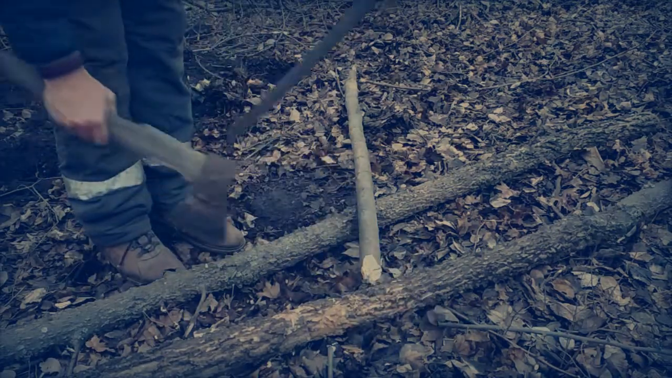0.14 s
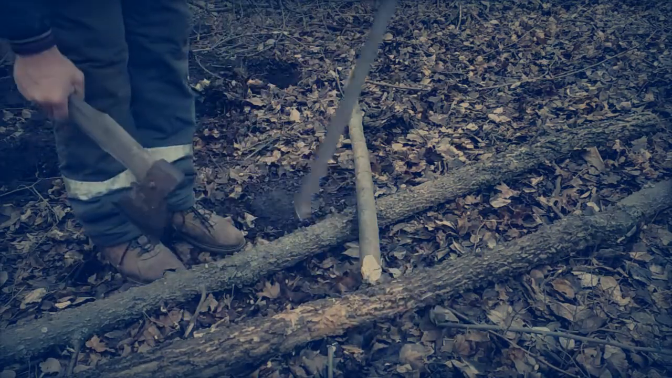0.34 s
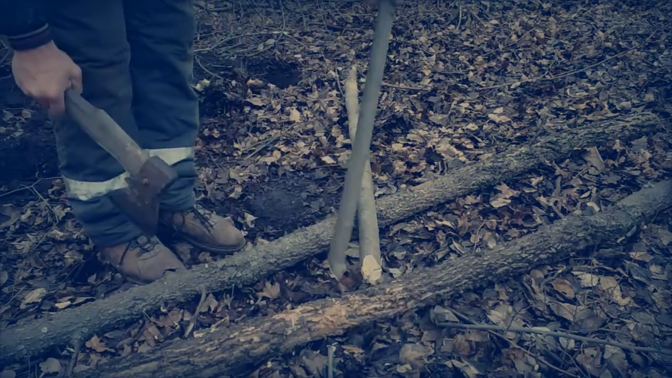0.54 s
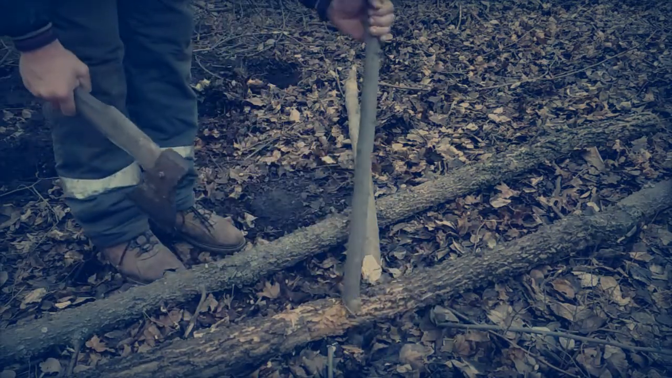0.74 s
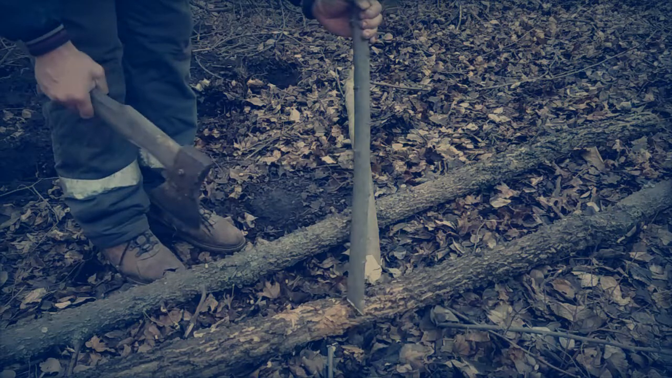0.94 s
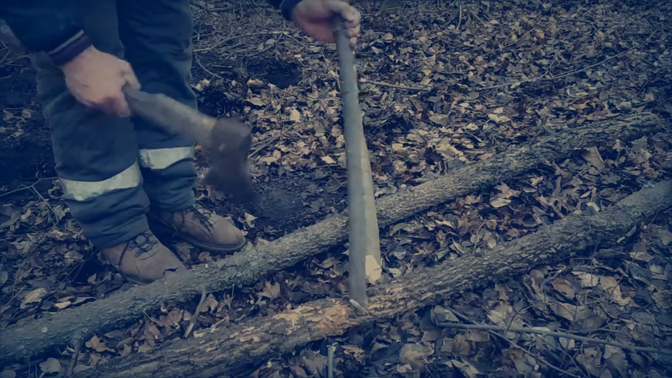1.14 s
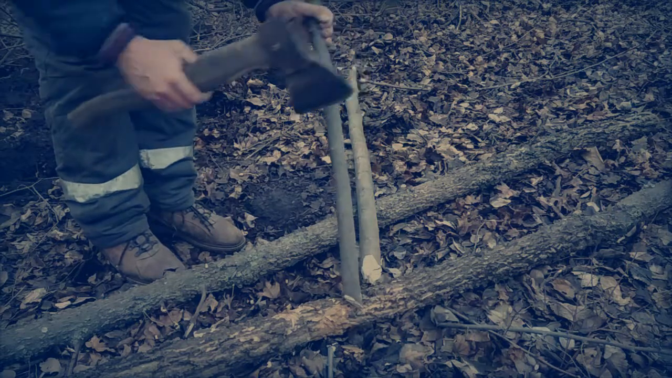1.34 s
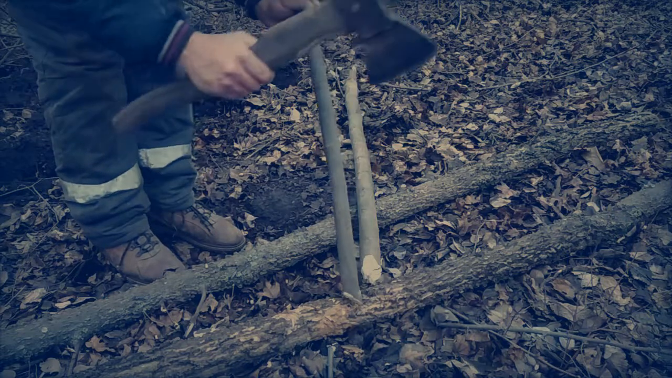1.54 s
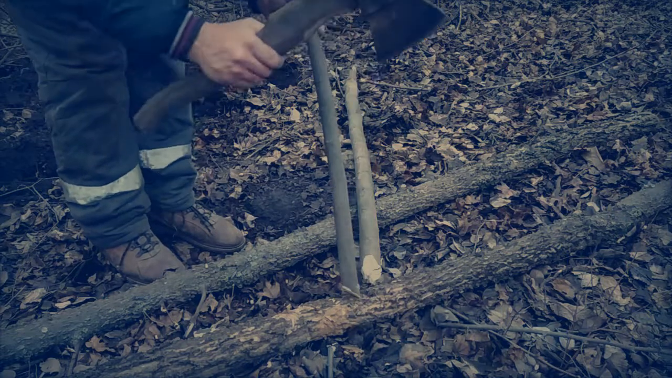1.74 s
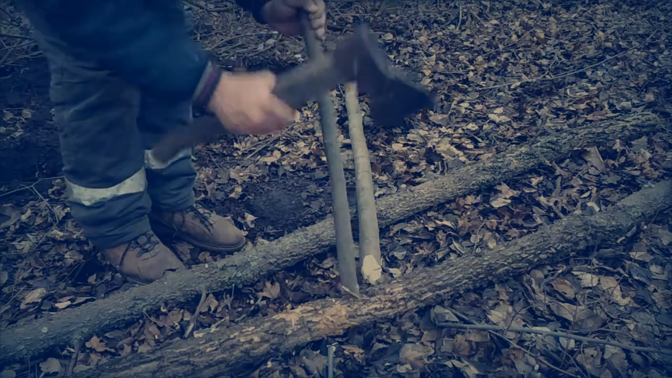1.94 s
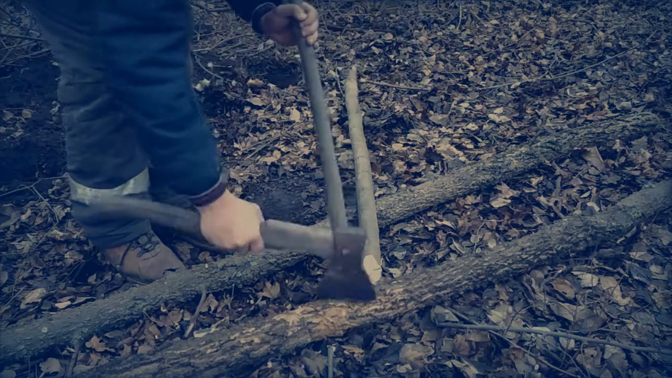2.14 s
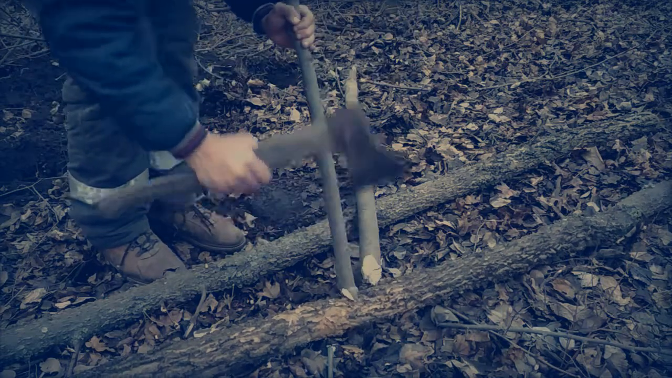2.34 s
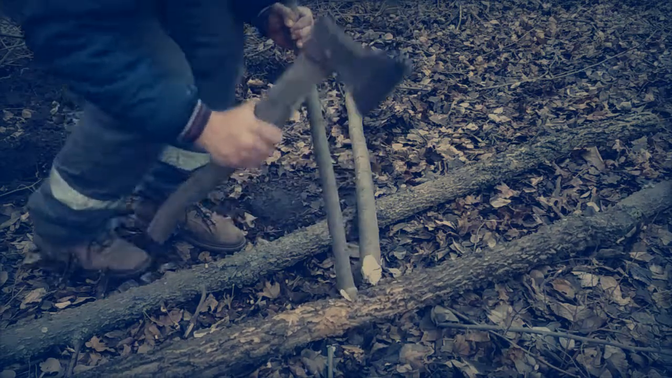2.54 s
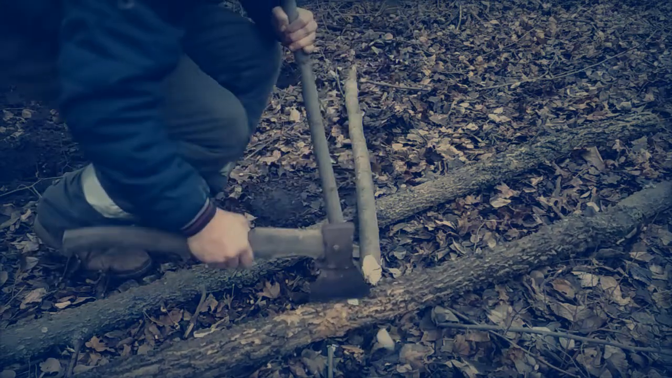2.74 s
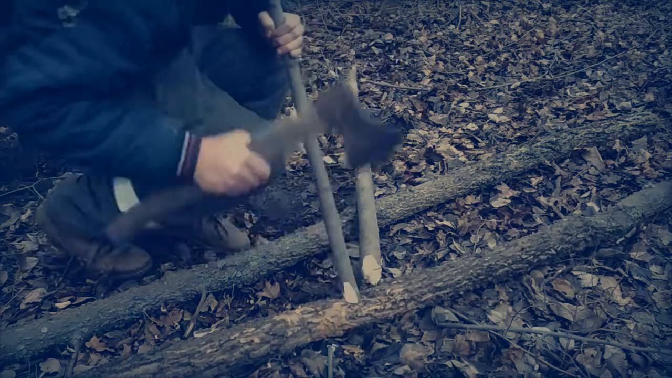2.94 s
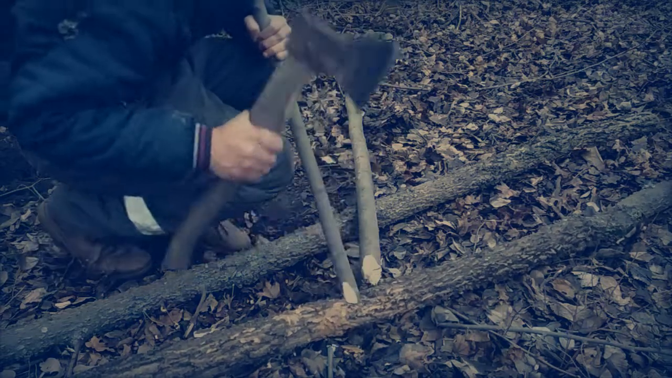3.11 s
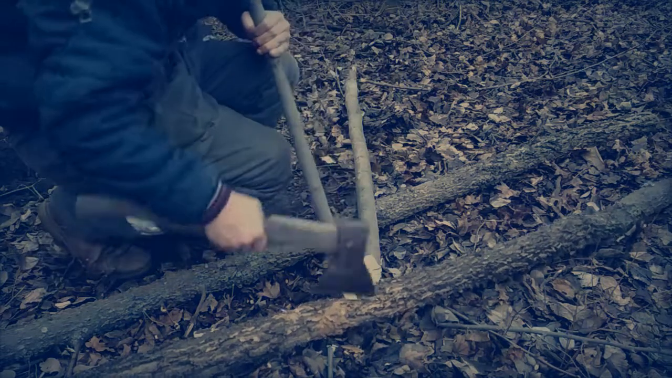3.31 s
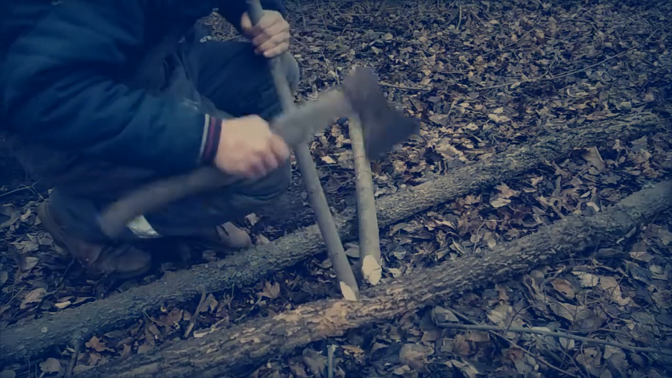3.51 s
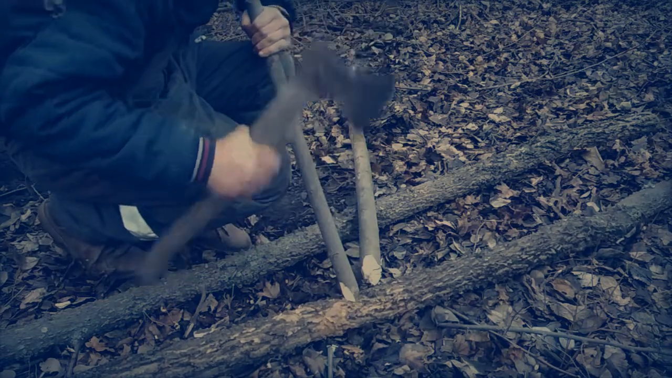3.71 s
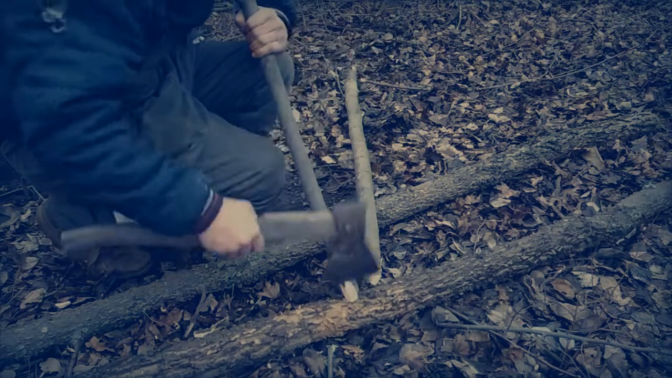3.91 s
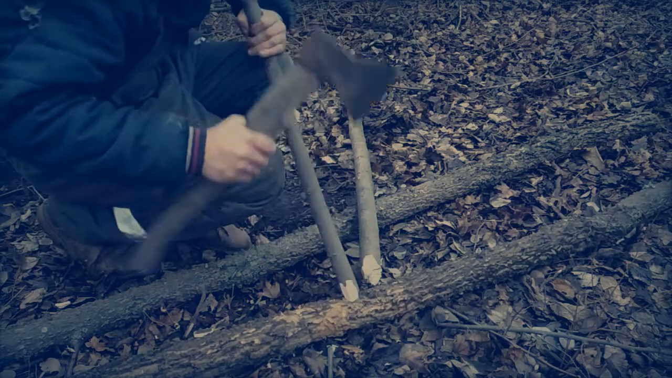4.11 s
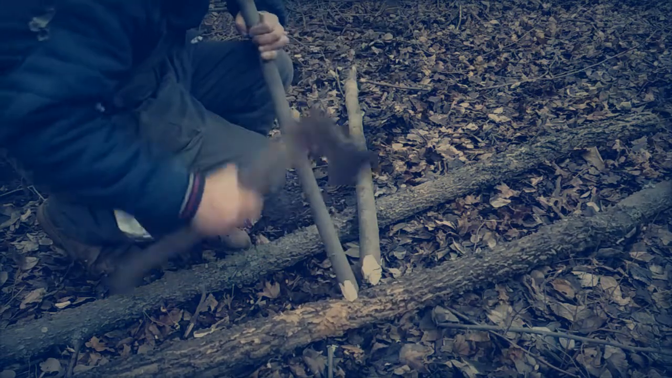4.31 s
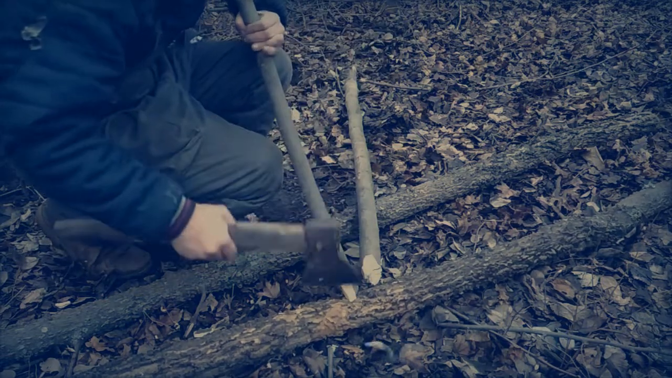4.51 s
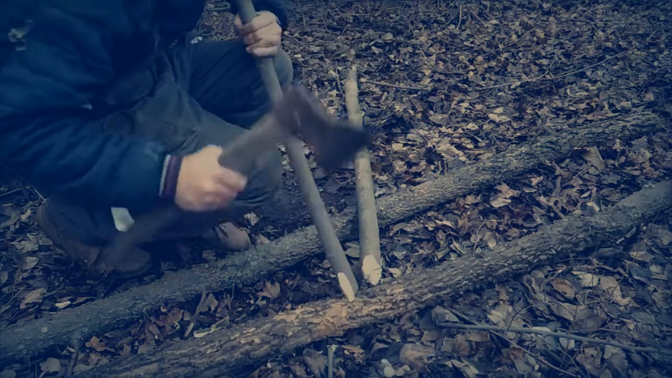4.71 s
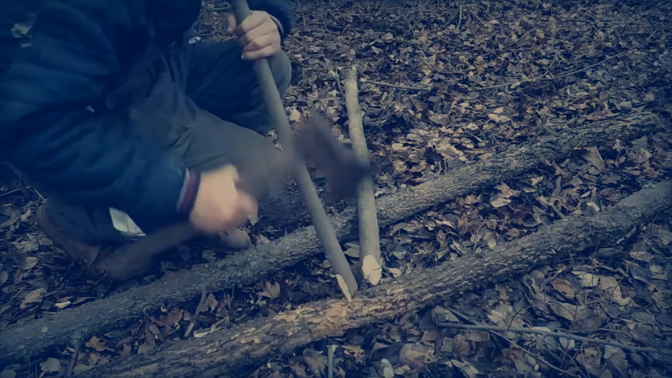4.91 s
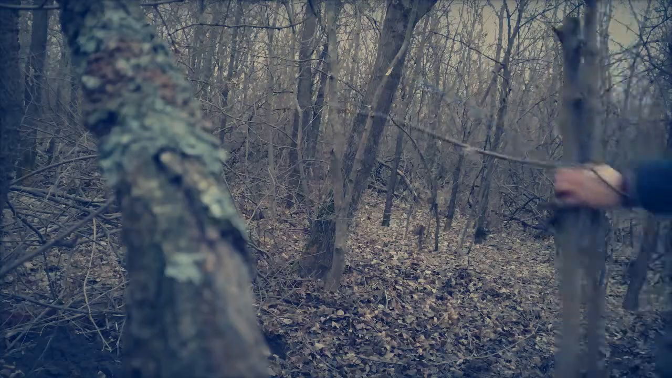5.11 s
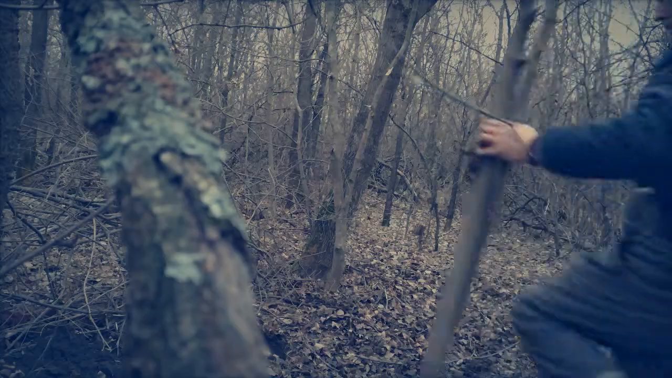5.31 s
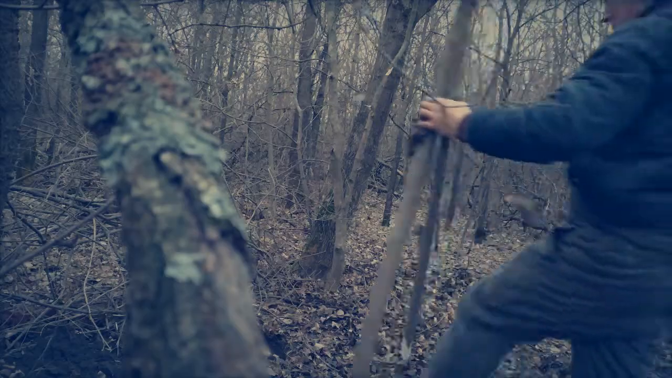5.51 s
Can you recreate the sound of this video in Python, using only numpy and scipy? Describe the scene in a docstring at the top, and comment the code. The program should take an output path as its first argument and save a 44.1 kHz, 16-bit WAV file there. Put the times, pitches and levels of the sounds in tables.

```python
"""Sharpening a stake with an axe in the forest

Six axe blows cut a wooden stake and land on a fallen log, or dully on the ground in blows 2 and 5;
then wood knocks dully on wood. A falling chirp makes the bite, ringing modes make stake, log and axe head,
and coloured noise grains make the tearing fibres and the thud of the landing.
Snaps pair noise cracks with a ringing splinter; dry leaves are patchy grains that swell with movement.
Wind is low noise with single push-and-suck thumps, and sparse decaying echoes scatter the blows back."""
import sys
import numpy as np
from scipy import signal
from scipy.fft import rfft, irfft
from scipy.io import wavfile
from scipy.ndimage import uniform_filter1d

SR = 44100
rng = np.random.default_rng(int(sys.argv[2]) if len(sys.argv) > 2 else 0)


def generate_wav(sig):
    """Save sig (samples, or channels by samples) to the path in sys.argv[1] as 16-bit PCM at SR."""
    pcm = np.round(np.clip(np.atleast_2d(sig).T, -1, 1) * 32767).astype(np.int16)
    wavfile.write(sys.argv[1], SR, pcm)


N = 244755

# axe blows: start_s, cut_s, bite_db, knock_db (stake, before a trim), tear_db, fizz_db (splinters), thud_db,
# log_db (before a trim), head_db (axe head ring), hard_db (landing, dB per octave), pitch (stake, factor),
# pan_db (left minus right)
BLOWS = [(2.0907, .0095, -9, -11.5, -15, -22, -10, -13, -62, 2.5, 1.0, -2),
         (2.679, .0100, -9.5, -10, -15.5, -19.5, -18, -27, -50, 2, 1.02, 1),
         (3.2464, .0095, -10.5, -8.5, -18.5, -14, -7.5, -6.5, -64.5, 3.5, 1.02, 0),
         (3.8141, .013, -8, -16.5, -18.5, -15, -8.5, -13, -64, -1, 1.05, 0),
         (4.391, .0195, -9.5, -9, -21, -19, -20.5, -26.5, -53, 9, .99, 0.5),
         (4.99, .0140, -16.5, -11, -28.5, -26.5, -14.5, -21.5, -68, -2.5, 1, 0.5)]
# spectrum of splinters, for fizz, cracks and chips, through a microphone that resonates near 9 kHz:
# pitch_hz, level_db (per Hz, relative)
FIZZ = [(1000, -34), (3000, -20.5), (5000, -24.5), (7100, -17.5), (7840, -5.5), (8150, -9.5), (8560, -2.5),
        (8900, -3.5), (9290, 0.5), (9750, -2.5), (10500, -13.5), (12000, -18.5), (16000, -32)]
# spectrum of a dull impact: pitch_hz, level_db (per Hz, relative)
THUD = [(30, -29.5), (90, -5), (140, -18.5), (210, 0.5), (290, -2.5), (420, -9.5), (550, 0.5), (830, -2.5),
        (1300, -8), (2500, -29.5), (4000, -35.5), (9000, -49.5)]
# single eddies at the microphone ports: centre_s, level_db, pitch_hz, pan_db (left minus right)
EDDIES = [(.41, -41.5, 45, -11), (0.774, -33, 40.2, 6), (1.04, -32.5, 35.8, 3), (1.4, -39, 25.7, 12),
          (1.634, -31, 57, 14.5), (1.782, -33, 36.4, 21), (1.856, -35, 45.5, 17), (2.058, -33.5, 42, 19),
          (2.74, -37.5, 50, 5.5), (4.44, -28, 44.2, 2.5), (4.509, -33.5, 55.6, 15), (4.656, -33, 73, 11),
          (4.874, -40, 40, 8.5), (5.099, -38.5, 45, 8)]


def axe():
    """The edge bites and jolts the stake, tears through, then lands on the log, or, in blows 2 and 5,
    dully on the ground."""
    # bending modes of the stake: pitch_hz (before the blow's pitch factor), level_db (relative), t60_s
    stake_modes = [(226, -16.5, 0.3), (405, -15, .04), (614, -9, .07), (754, 2.5, .05), (831, 1.5, 0.075),
                   (972, 1.5, 0.017), (1246, -8.5, 0.03), (1493, 0.5, 0.021), (1710, 2.5, 0.0091),
                   (2010, -4.5, 0.02), (2390, 0, 0.036), (4040, -11.5, .012)]
    # modes of the fallen log: pitch_hz, level_db (relative, before the hardness tilt), t60_s
    log_modes = [(167, -22.5, 0.2), (233, -5.5, 0.16), (346.4, 6, 0.11), (499, 0.5, 0.13),
                 (534, -11.5, 0.18), (621, -4, 0.18), (740, -12.5, .06), (764, -8.5, 0.041),
                 (937, -19, 0.1), (984, -6, 0.1), (1050, -19, .09), (1085, -12, 0.031), (1400, -7, 0.019),
                 (1680, -18, 0.023), (1895, -12.5, 0.027), (2430, -24, .05), (2570, -15.5, .04)]
    # modes of the axe head: pitch_hz (before a pitch factor), level_db (relative), t60_s
    head_modes = [(4048, 0, .42), (4120, -4, .3), (6300, -9, .25)]
    # spectrum of tearing fibres: pitch_hz, level_db (per Hz, relative)
    tear_spectrum = [(100, -29.5), (300, -3.5), (600, -0.5), (1000, 2.5), (1800, -12.5), (2600, -2.5),
                     (3300, -20.5), (4200, -10.5), (6000, -15), (12000, -33)]
    out = np.zeros((2, N))
    for (start, cut, bite_db, knock_db, tear_db, fizz_db, thud_db,
         log_db, head_db, hard_db, pitch, pan_db) in BLOWS:
        pan = amp([[pan_db / 2], [-pan_db / 2]])
        landing = start + cut

        knock = amp(knock_db - 5.5) * ring(stake_modes, pitch, 0, travel=.0025, apart=0.61)
        head = amp(head_db) * ring(head_modes, 0.94, 0, travel=0)
        tear = burst(cutting(cut, rise=.002, release=.008), tear_spectrum, spread_db=3, apart=.55)
        fizz = burst(cutting(cut, rise=0.00049, release=0.0072), FIZZ, spread_db=6.5, apart=0.67)
        fizz_and_chips = fizz + amp(-24) * chips()
        thud = burst(cutting(0.0034, rise=0.00085, release=0.011), THUD, spread_db=-0.5, apart=0.63)
        log_ring = ring(log_modes, 1, hard_db, travel=.0012, apart=.35)

        add(out, start + 0.00029, pan * amp(bite_db) * bite(hz=1750 * pitch, spread=0.0014))
        add(out, start, pan * (knock + head))
        add(out, start, pan * (amp(tear_db) * tear + amp(fizz_db) * fizz_and_chips))
        add(out, landing, pan * amp(thud_db) * thud)
        add(out, landing, pan * amp(log_db - 2.5) * log_ring)
    return out


def bite(hz, spread):
    """The edge's jolt runs down the stake as a bending wave and reaches the air as a very short falling chirp."""
    t = np.arange(SR // 40) / SR
    turns = hz * np.cumsum(1.3 / (1 + t / 0.0037)) / SR  # starts 1.3 times above hz
    swell = t / spread * np.exp(.5 - .5 * (t / spread) ** 2)  # peaks at t = spread
    return swell * np.sin(2 * np.pi * turns + np.array([[.15], [-.15]]))


def cutting(length, rise, release):
    """Force on the fibres: builds as the wedge enters and lets go when the blade is through (all in s)."""
    t = np.arange(SR // 5) / SR
    return (1 - np.exp(-t / rise)) * np.exp(-np.maximum(t - length, 0) / release)


def chips():
    """Chips patter down into the leaves just after a blow."""
    fall = cutting(0.03, rise=.012, release=0.04)
    return burst(fall, FIZZ, spread_db=7.5, apart=.4)


def bumps():
    """A pole knocks against wood without being cut: it rings over a dull puff."""
    # knocks: time_s, level_db, pitch (factor), bright_db (dB per octave)
    knocks = [(5.1450, -43.5, 1.42, 7), (5.362, -21, 1.0, 1)]
    # modes of the pole: pitch_hz (before the factor), level_db (relative, before the tilt), t60_s
    pole_modes = [(169, -24, 0.39), (290.7, -12.5, 0.18), (392, -14, 0.056), (560, -4, 0.17),
                  (619, 2, 0.059), (752, -1.5, 0.058), (855, 3, 0.033), (960, -1, 0.049),
                  (1030, -3.5, 0.048), (1136, -13, 0.061), (1357, -5.5, 0.055), (1715, -4, 0.016),
                  (1980, -25, 0.054), (2700, -23.5, 0.036)]
    out = np.zeros((2, N))
    for time, db, pitch, bright_db in knocks:
        pole = ring(pole_modes, pitch, bright_db, travel=0.00307, apart=0.34)
        puff = burst(cutting(.004, rise=0.0026, release=0.02), THUD, spread_db=1, apart=0.37)
        add(out, time - .002, amp(db) * pole)
        add(out, time + 0.00228, amp(db - 8.5) * puff)
    return out


def snaps():
    """A breaking fibre or twig: a millisecond of crack, a woody body and the brief ping of the splinter."""
    # breaks: start_s, crack_db, body_db, ping_db, pitch (factor for body and ping)
    breaks = [(0.7155, -29.5, -38, -43, 2.6), (0.741, -36, -53, -60, 1.4), (1.5970, -31, -43.5, -50, 1.8),
              (2.091, -16, -16, -32, 0.85), (2.1, -8, -6, -18, 1), (2.6522, -31.5, -61, -64, 2.4),
              (2.684, -13.5, -24, -32, 0.69), (2.9050, -27, -29.5, -38, 1.15),
              (2.9205, -39.5, -33, -50, 1.38), (3.251, -6.5, -18.5, -25, 1.7), (3.2535, -3.5, -3, -15, 1),
              (3.8175, -8, -21, -27.5, 0.45), (3.827, -13.5, -19.5, -28.5, 0.69),
              (4.3961, -28, -18, -20, 1.67), (4.4120, -8.5, -10, -14.5, 1.01),
              (5.0046, -17, -17.5, -20, 1.12), (5.1735, -37.5, -56, -62, 3.4), (5.209, -40, -42, -41, 0.73)]
    # spectrum of the woody body: pitch_hz (before the factor), level_db (per Hz, relative)
    body_spectrum = [(200, -23.5), (800, -8.5), (1400, -8), (2000, 1.5), (2600, 3), (3300, -12.5),
                     (4200, -12), (5500, -7), (7000, -24.5), (15000, -48.5)]
    # modes of a snapping splinter: pitch_hz (before the factor), level_db (relative), t60_s
    splinter_modes = [(1650, -11, .015), (2560, 0, .022), (2900, -9, .015), (3400, -11, .015)]
    out = np.zeros((2, N))
    for start, crack_db, body_db, ping_db, pitch in breaks:
        crack = burst(cutting(0.0012, rise=0.00047, release=0.00098), FIZZ, spread_db=0.5, apart=0.22)
        pitched_body = np.multiply(body_spectrum, [pitch, 1])
        body = burst(cutting(.0008, rise=0.0007, release=0.0019), pitched_body, spread_db=1.5, apart=0.42)
        ping = ring(splinter_modes, pitch, 0, travel=0, apart=0.23)
        add(out, start, amp(crack_db) * crack + amp(body_db) * body)
        add(out, start, amp(ping_db) * ping)
    return out


def ports(x):
    """The left port hears more bass, and hears the work a moment later than the right."""
    # microphone pair: pitch_hz, balance_db (left minus right)
    balance = [(100, 4.5), (300, 5.5), (600, 3), (1200, 1.5), (2500, 1), (5000, -2), (9000, -2),
               (14000, -2)]
    hz = np.fft.rfftfreq(N, 1 / SR)
    delay_s = 2.2e-5  # left behind right
    half = amp(read(balance, hz) / 2) * np.exp(-1j * np.pi * hz * delay_s)
    return irfft(rfft(x) * np.array([half, 1 / half]), N)


def forest(x):
    """Trunks and leaf litter scatter sparse echoes, each band dying at its own speed."""
    # echo strength: pitch_hz, level_db
    echo_level = [(100, -24), (500, -22.5), (1200, -19.5), (2600, -15.5), (3800, -12), (6000, -17.5),
                  (9500, -24), (14000, -24)]
    # echo decay: pitch_hz, t60_s
    echo_t60 = [(200, 0.55), (700, 0.15), (1800, 0.1), (4500, 0.15), (9500, 0.17), (14000, .3)]
    sparse = rng.standard_normal((2, SR)) * (rng.random((2, SR)) < 2500 / SR)  # 2500 echoes per s on average
    hz, t, bands = signal.stft(sparse, SR, nperseg=256)
    t60 = read(echo_t60, hz)[:, None]
    decay = (1 - np.exp(-t / .012)) * 10 ** (-3 * t / t60)
    decay *= amp(read(echo_level, hz))[:, None] / np.sqrt(np.mean(decay ** 2, 1, keepdims=True))
    tail = signal.istft(bands * decay, SR, nperseg=256)[1] / np.linalg.norm(sparse[0])
    return signal.fftconvolve(x, tail, axes=1)[:, :N]


def leaves():
    """Stirred or settling dry leaves: tiny crackles in loose clumps, over a duller scuffing."""
    # a boot, knee or pole stirs the leaves: peak_s, rise_s, fall_s, crackle_db, scuff_db
    moves = [(0, .05, .08, -72.5, -88), (.41, .06, 0.11, -86, -77), (0.724, .009, 0.069, -49, -58.5),
             (1.0, 0.14, 0.14, -59, -91), (1.58, .2, 0.45, -52.5, -83), (1.93, .12, 0.42, -55, -59.5),
             (2.06, .09, .05, -48, -51), (2.487, .04, 0.051, -47.5, -76), (2.83, .04, 0.068, -49.5, -53.5),
             (2.93, .025, 0.056, -46, -60), (3.22, .1, 0.069, -57, -73.5), (4.11, .04, 0.073, -62, -81),
             (4.52, .03, 0.06, -54, -54.5), (4.74, .025, 0.036, -57.5, -78.5),
             (4.83, 0.025, .025, -57.5, -65.5), (4.915, 0.031, 0.048, -57.5, -78),
             (5.191, .08, 0.087, -49.5, -53), (5.338, .02, 0.08, -49.5, -65),
             (5.45, .06, 0.18, -51.5, -54.5)]
    # spectrum of the crackle: pitch_hz, level_db (per Hz, relative)
    crackle_spectrum = [(200, -13), (900, -7.5), (2000, -13.5), (3200, -12), (5000, -11.5), (7000, -7.5),
                        (9300, 0.5), (10400, -5.5), (11500, -19.5), (15000, -37.5)]
    # spectrum of the dull scuffing: pitch_hz, level_db (per Hz, relative)
    scuff_spectrum = [(200, -9.5), (900, 0.5), (1800, -3), (2800, -5), (4000, -12.5), (7000, -16),
                      (12000, -41.5)]
    still_db = -78  # leaves that tick when nobody moves
    settle_db, settle_delay_s, settle_rise_s, settle_fall_s = -25, 0.044, .01, 0.063  # dB re the blow's fizz
    crinkles_per_s, crinkle_db = 120, -8  # single leaves that crack, dB re the rustle

    clumps = amp(evened(uniform_filter1d(rng.standard_normal(N), size=700)))
    rustle = patchy(colour(grains(N, spread_db=3.6, apart=.8) * clumps, crackle_spectrum))
    single = grains(N, spread_db=1, apart=0.89) * (rng.random(N) < crinkles_per_s / SR)
    crackle = rustle + amp(crinkle_db) * evened(colour(single, crackle_spectrum))
    scuff = patchy(colour(grains(N, spread_db=3.8, apart=.6) * clumps, scuff_spectrum))

    stirring = [(peak, rise, fall, db) for peak, rise, fall, db, _ in moves]
    scuffing = [(peak, rise, fall, db) for peak, rise, fall, _, db in moves]
    settling = [(start + settle_delay_s, settle_rise_s, settle_fall_s, fizz_db + settle_db)
                for start, _, _, _, _, fizz_db, *_ in BLOWS]
    return swells(stirring + settling, still_db) * crackle + swells(scuffing, still_db) * scuff


def buffets():
    """A passing eddy pushes on the port, then sucks."""
    out = np.zeros((2, N))
    t = np.arange(-SR // 20, SR // 20) / SR
    for centre, db, hz, pan_db in EDDIES:
        u = 2 * np.pi * hz * t
        thump = -u * np.exp(.5 - .5 * u ** 2)
        add(out, centre + t[0], amp([[db + pan_db / 2], [db - pan_db / 2]]) * thump)
    return out


def air():
    """The steady hush of the woods, and a rumble that swells around each eddy, mostly on the left port."""
    # spectrum of the wind rumble: pitch_hz, level_db (per Hz, relative)
    wind_spectrum = [(10, -1), (30, 1.5), (60, 1.5), (100, -7.5), (170, -11), (300, -30), (800, -56.5),
                     (3000, -93)]
    # spectrum of the hush: pitch_hz, level_db (per Hz, relative)
    hush_spectrum = [(20, -8.5), (74, -19.5), (124, -15), (235, -16.5), (400, -19), (555, -19.5),
                     (796, -23.5), (1270, -32.5), (2200, -44.5), (4200, -56.5), (9500, -63.5),
                     (12000, -70.5), (15000, -87)]
    wake_db, wake_rise_s, wake_fall_s = -6.5, 0.078, 0.11  # dB re the eddy's thump, before the left-right gains
    breeze_db = -59.5  # rumble between the eddies, before the left-right gains
    hush = amp(-48.5) * evened(colour(grains(N, spread_db=-1.5, apart=0.68), hush_spectrum))
    wakes = swells([(s, wake_rise_s, wake_fall_s, db + wake_db) for s, db, *_ in EDDIES], breeze_db)
    gusts = wakes * evened(colour(grains(N, spread_db=-1.5, apart=0.68), wind_spectrum))
    return hush + gusts * amp([[2], [-2.5]])


def ring(modes, pitch, tilt_db, travel, apart=.3):
    """Bending modes in two channels; low waves run slower and arrive later (travel: s at 1 kHz)."""
    hz, db, t60 = np.transpose(modes)[:, :, None]
    t = np.maximum(np.arange(SR // 3) / SR - travel * np.sqrt(1000 / hz), 0)
    cycles = hz * pitch * t
    level = amp(db + tilt_db * np.log2(hz / 600) - 60 * t / t60)
    level *= 1 - np.exp(-2 * cycles ** 2)  # soft onset within about a cycle
    # every mode radiates in its own directions, so the two ports catch it at different phases
    skew = apart * rng.choice([-1, 1], hz.shape) * np.minimum(hz / 1000, 1)
    return np.array([(level * np.sin(2 * np.pi * cycles + phase)).sum(0) for phase in (skew, -skew)])


def burst(envelope, spectrum, spread_db, apart):
    """Grains under an envelope, coloured, with the energy of that envelope."""
    x = colour(grains(len(envelope), spread_db, apart) * envelope, spectrum)
    return evened(x) * np.sqrt(np.mean(envelope ** 2))


def grains(n, spread_db, apart):
    """Two channels of noise made of unequal grains; apart is the part that the channels do not share."""
    shared, side = rng.standard_normal((2, n))
    size = amp(spread_db * np.minimum(rng.exponential(1, n), 5))
    return evened(size * np.array([shared + apart * side, shared - apart * side]))


def colour(x, spectrum, size=4096):
    """Causal filter of unit energy with the given spectrum."""
    log_gain = np.log(amp(read(spectrum, abs(np.fft.fftfreq(size, 1 / SR)))))
    # minimum phase: the energy comes as early as the spectrum allows
    taps = np.fft.ifft(np.exp(np.conj(signal.hilbert(log_gain)))).real[:size // 2]
    return signal.oaconvolve(x, taps[None] / np.linalg.norm(taps), axes=1)[:, :x.shape[1]]


def patchy(x):
    """Different leaves sound at different moments: the level drifts in patches of time and pitch."""
    bands = signal.stft(x, SR, nperseg=256)[2]
    field = rng.standard_normal(bands.shape[1:])
    field = uniform_filter1d(field, size=9, axis=0)
    field = evened(uniform_filter1d(field, size=10, axis=1))
    return evened(signal.istft(bands * amp(2.0 * field), SR, nperseg=256)[1][:, :N])


def swells(events, rest_db):
    """Gain over time of swells (s, rise s, fall s, dB) that grow and die exponentially above a resting level."""
    t = np.arange(N) / SR
    power = amp(rest_db) ** 2
    for peak, rise, fall, db in events:
        shape = np.exp(-np.maximum((peak - t) / rise, (t - peak) / fall))
        power = power + (amp(db) * shape) ** 2
    return np.sqrt(power)


def amp(db):
    """Decibels to gain."""
    return 10 ** (np.asarray(db) / 20)


def read(points, hz):
    """A spectrum's value at hz, on a log-frequency axis."""
    f, value = np.transpose(points)
    return np.interp(np.log(hz + 1), np.log(f), value)


def evened(x):
    """Scales to rms 1."""
    return x / np.sqrt(np.mean(x ** 2) + 1e-20)


def add(mix, s, sound):
    """Mixes a sound in at time s."""
    part = mix[:, round(s * SR):][:, :sound.shape[-1]]
    part += sound[..., :part.shape[1]]


def scene():
    """The chopping with its echoes, over leaves and air."""
    work = axe() + bumps() + snaps()
    # keeps the deep bass out of the blows, knocks and snaps
    work = signal.sosfilt(signal.butter(2, 55, "highpass", fs=SR, output="sos"), work)
    return ports(work) + forest(work) + leaves() + air() + buffets()


def record(dry):
    """The loudest peaks overload softly; then the band limit."""
    ceiling, edge_hz = .93, 16200
    held = dry / (1 + (dry / ceiling) ** 6) ** (1 / 6)
    lowpass = signal.firwin(255, edge_hz, window=("kaiser", 8), fs=SR)
    return signal.oaconvolve(held, lowpass[None], "same")


dry = scene()
out = record(dry)
generate_wav(out)
```